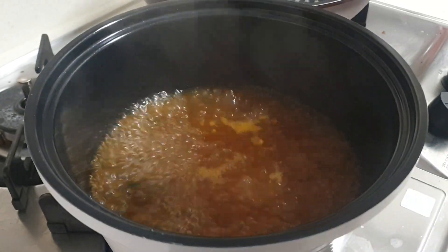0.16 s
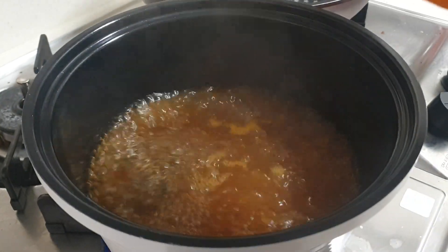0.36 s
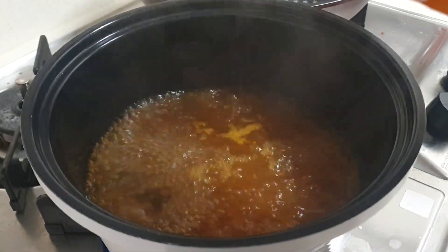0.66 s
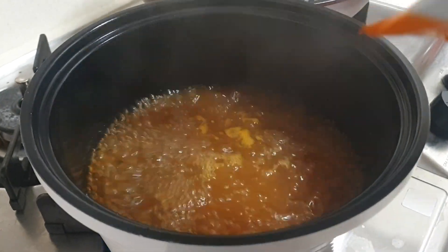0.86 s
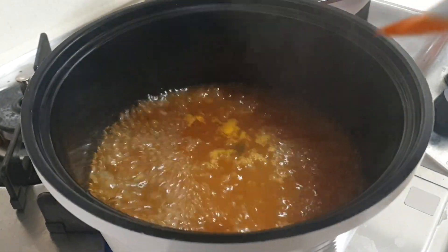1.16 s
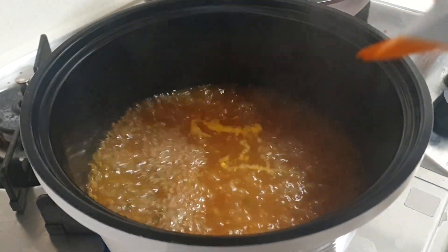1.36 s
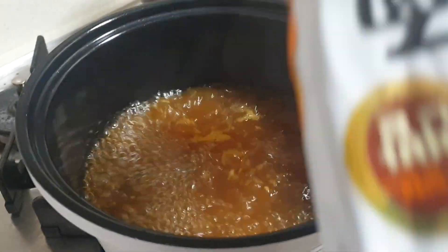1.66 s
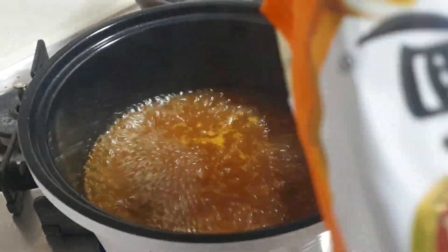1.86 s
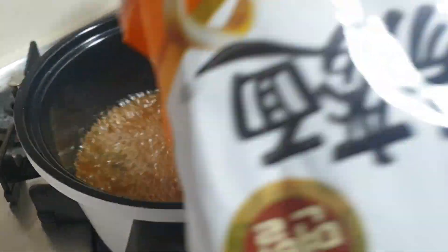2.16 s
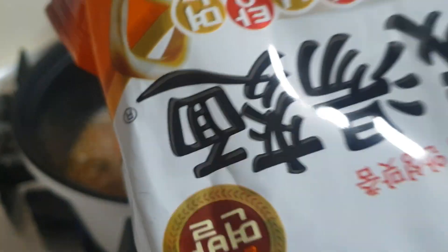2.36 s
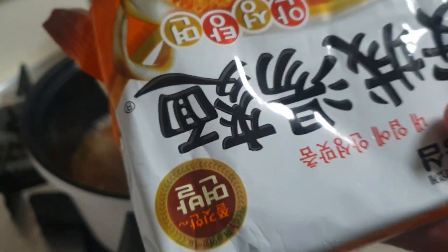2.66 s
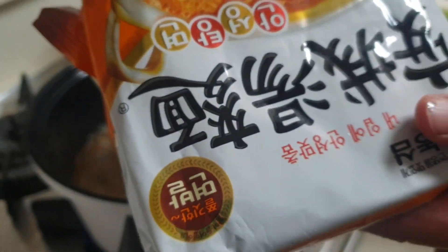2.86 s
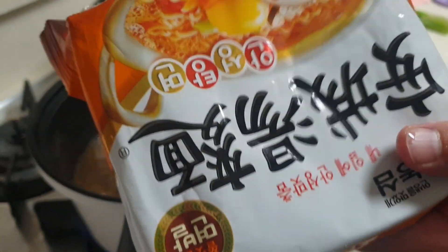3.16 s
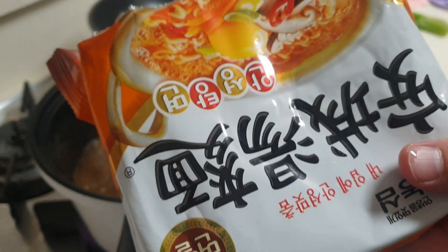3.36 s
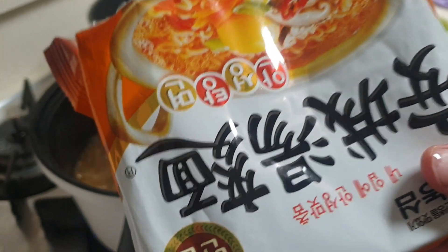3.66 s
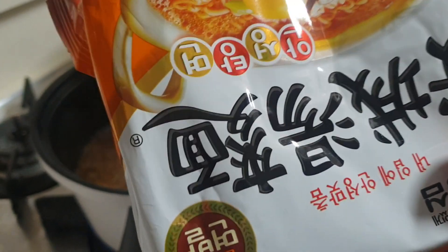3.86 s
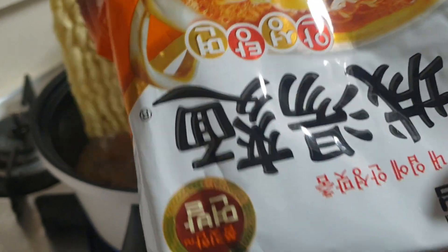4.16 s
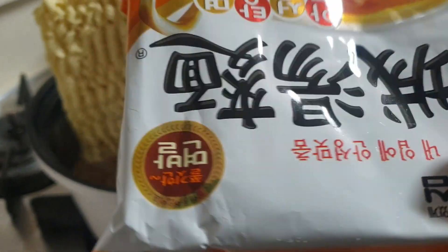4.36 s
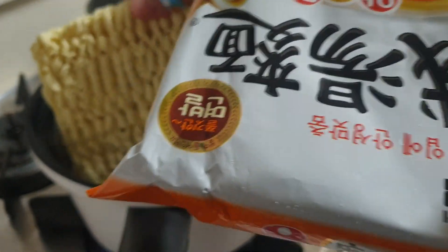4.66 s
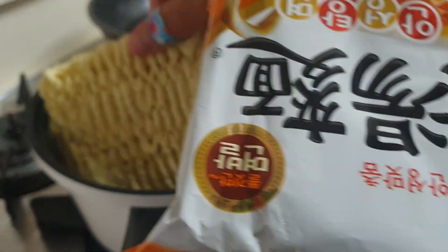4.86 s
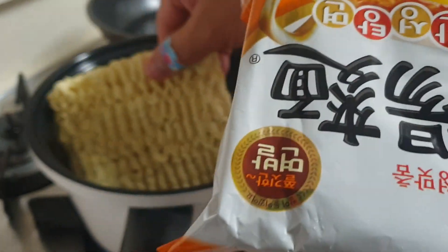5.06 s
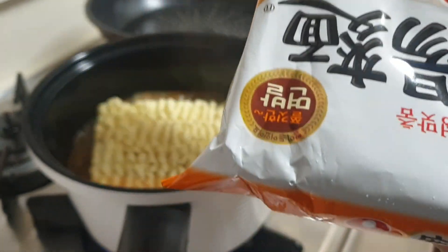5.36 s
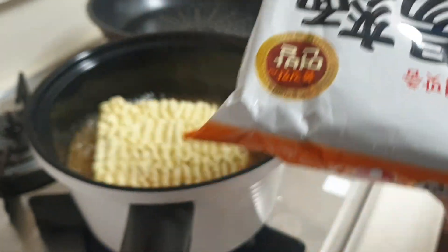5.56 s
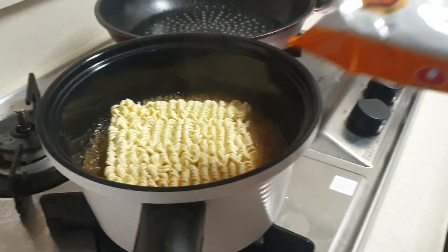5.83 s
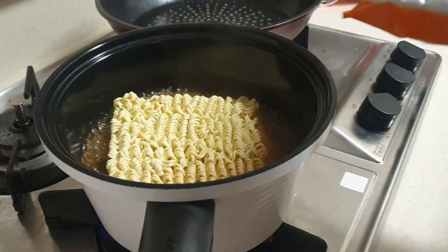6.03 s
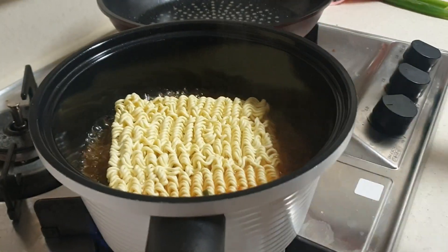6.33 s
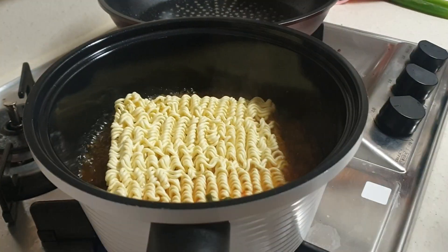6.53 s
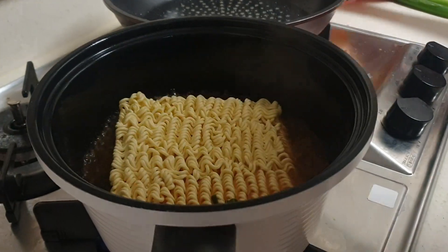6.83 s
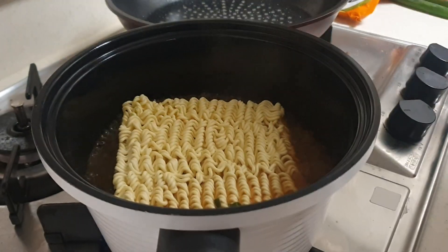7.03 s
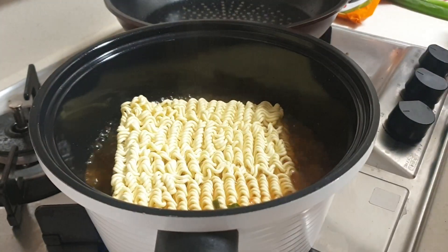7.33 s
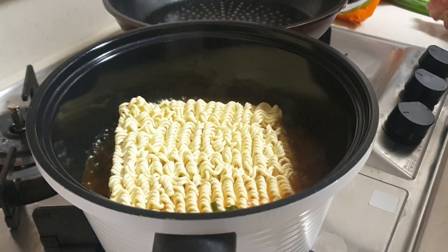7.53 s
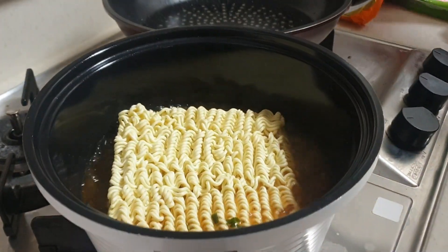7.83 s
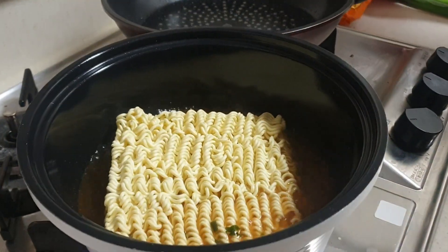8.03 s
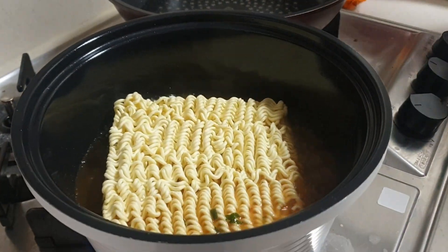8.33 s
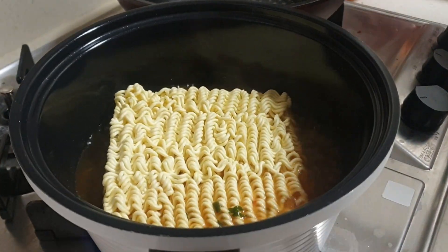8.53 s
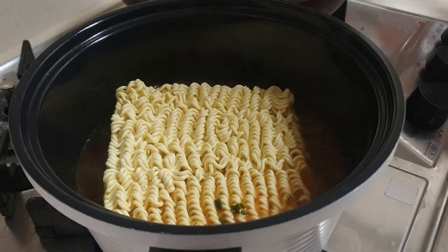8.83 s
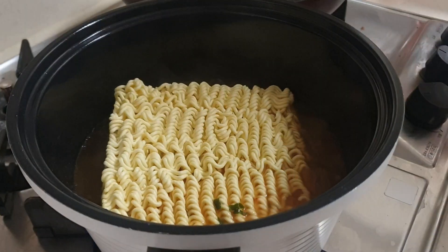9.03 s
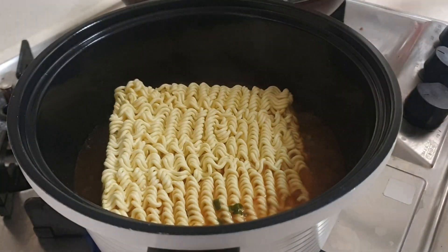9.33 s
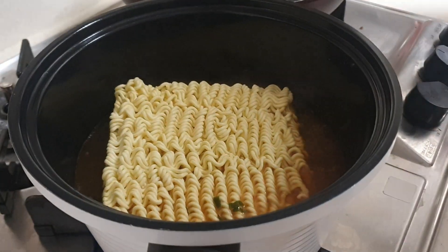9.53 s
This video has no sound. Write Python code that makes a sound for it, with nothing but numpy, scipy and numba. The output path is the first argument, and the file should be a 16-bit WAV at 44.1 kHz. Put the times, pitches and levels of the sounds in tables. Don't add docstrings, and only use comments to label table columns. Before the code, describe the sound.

Close to a handheld microphone, a stiff plastic noodle packet is grabbed and swung with dense, sharp snaps, pops and bright crinkles. The crackling thins after three seconds, leaving a soft simmer and gas flame. A dry noodle block lands with a dull thud and hollow knock, then the packet is put down with a few snaps and knocks as the bubbling grows clearer in a small hard kitchen.

```python
import sys
import numpy as np
from scipy import signal
from scipy.fft import rfft, irfft, next_fast_len
from scipy.io import wavfile
from scipy.ndimage import uniform_filter1d
from numba import njit

SR = 44100
rng = np.random.default_rng(int(sys.argv[2]) if len(sys.argv) > 2 else 0)


def volts_from_db(level):
    exponent = np.asarray(level, float) / 20
    return 10 ** exponent


def bounce(signal):
    frames = np.transpose(np.atleast_2d(signal))
    limited = np.clip(frames, -1, 1)
    pcm = np.round(limited * 32767).astype(np.int16)
    wavfile.write(sys.argv[1], SR, pcm)


N = 427329
PAD = next_fast_len(N)
HZ = np.maximum(np.fft.rfftfreq(PAD, 1 / SR), 1)
TIME = np.arange(N) / SR


def on_hz(table):
    hz, value = np.array(table).T
    return np.interp(np.log(HZ), np.log(hz), value)


def unit(x):
    return x / np.sqrt(np.mean(np.mean(x, axis=0) ** 2))


# (frequency [Hz], correlation [-1 to 1])
PORT_LIKENESS = [(60, 0.85), (300, 0.92), (800, 0.65), (2000, 0.079), (5000, 0.027)]


def pair(left, right, db, side_db=0):
    like = np.clip(on_hz(PORT_LIKENESS), 0, 1)
    a, b = rfft(left, PAD), rfft(right, PAD)
    b = like * a + np.sqrt(1 - like ** 2) * b
    both = np.array([a * volts_from_db(db + side_db / 2), b * volts_from_db(db - side_db / 2)])
    return irfft(both, PAD)[:, :N]


def noise_pair():
    return rng.standard_normal((2, N))


def band_db(lo_hz, hi_hz):
    return -10 * np.log10((1 + (lo_hz / HZ) ** 6) * (1 + (HZ / hi_hz) ** 6))


def resonance_db(modes):
    return sum(db / (1 + (2 * (HZ - hz) / width_hz) ** 2) for hz, width_hz, db in modes)


def bandpass(x, order, lo_hz, hi_hz):
    return signal.sosfilt(signal.butter(order, [lo_hz, hi_hz], "band", fs=SR, output="sos"), x)


@njit
def svf(x, hz, width):
    y, band, low = np.empty(len(x)), 0., 0.
    for i in range(len(x)):
        g, k = np.tan(np.pi * hz[i] / SR), width[i] / hz[i]
        v = (band + g * (x[i] - low)) / (1 + g * (g + k))
        band, low, y[i] = 2 * v - band, low + 2 * g * v, k * v
    return y


def fade(x, tau_s):
    return signal.lfilter([1], [1, -np.exp(-1 / (tau_s * SR))], x)


def walk(rate):
    k = int(SR / rate)
    held = np.repeat(rng.standard_normal(N // k + 1), k)
    return 0.91 * uniform_filter1d(uniform_filter1d(held, k), k)[:N]


def sparks(rate, spread_db, tau_s):
    at = rng.integers(0, N, int(rate * N / SR))
    power = np.zeros(N)
    power[at] = volts_from_db(2 * spread_db * np.minimum(rng.exponential(size=len(at)), 3))
    power = fade(power, tau_s)
    return power / power.mean()


# (time [s], level [dB], half length [s])
BURNER_SWELLS = [(4.25, -53, 0.13), (6.45, -52.5, 0.28), (8.85, -52, 0.27), (9.45, -49, .3)]


def burner_throb():
    throb_hz = 44 * (1 + 0.051 * walk(4))
    swell = sum(volts_from_db(db) * np.exp(-((TIME - s) / half_s) ** 2) for s, db, half_s in BURNER_SWELLS)
    return np.sin(2 * np.pi * np.cumsum(throb_hz) / SR) * swell


# (frequency [Hz], level [dB per Hz])
POT_COLOUR = [(25, 3.5), (50, 2), (110, -9), (250, -14), (450, -22.5), (1000, -26.5), (1330, -32),
              (1700, -25.5), (2500, -26), (2950, -33.5), (7600, -34), (9200, -34), (10000, -25.5),
              (11800, -27)]


def flame(view):
    rumble = pair(*noise_pair(), on_hz(POT_COLOUR) + band_db(35.5, 100), 0.99)
    return unit(rumble) * volts_from_db(-59.5 + 3 * view + 1.5 * walk(2.86))


# (frequency [Hz], left minus right [dB])
POT_LEAN = [(60, 10.5), (110, 1.5), (200, 7), (380, 9), (700, 15.5), (1290, 16), (2380, 15.5), (4400, 13),
            (8120, 17.5), (15000, 1.5)]
# (frequency [Hz], width [Hz], level [dB])
POT_RING = [(633, 21, 7.5), (870, 47, 2.5)]
# (frequency [Hz], width [Hz], level [dB])
GAS_JETS = [(8480, 260, 7), (9950, 200, 6), (11650, 250, 5)]


def simmer_and_steam(view):
    fizz = np.sqrt(0.68 + 0.28 * sparks(320, 5.6, 0.0058))
    colour = on_hz(POT_COLOUR) + resonance_db(POT_RING) + band_db(70.3, SR)
    colour -= 5 * np.clip(HZ / 4000 - 2.95, 0, 1)
    hiss = unit(pair(*(fizz * noise_pair()), colour, on_hz(POT_LEAN)))
    jets = irfft(rfft(hiss, PAD) * (volts_from_db(resonance_db(GAS_JETS)) - 1), PAD)[:, :N]
    hiss = hiss + jets * np.clip(1.1 - view, 0, 1)
    hiss = hiss * volts_from_db(0.5 + 2.5 * view + 0.6 * walk(9))
    for lo_hz, hi_hz in (300, 900), (900, 2700):
        patch = bandpass(hiss, 2, lo_hz, hi_hz)
        hiss = hiss + patch * (volts_from_db(2.2 * walk(16)) - 1)
    steam = unit(bandpass(fizz * noise_pair(), 3, 9500, 15500))
    steam_db = -69 + 9.5 * view + np.array([[2.1], [-2.1]])
    return hiss * volts_from_db(-57) + steam * volts_from_db(steam_db)


# (time [s], open view [0-1])
POT_VIEW = [(0, 0.6), (3.3, 0.15), (4.3, 0.05), (5.6, .5), (6.3, 0.84), (7.5, 0.9), (8.4, 0.9), (8.9, 0.9),
            (9.69, 0.8)]


def pot():
    view = np.interp(TIME, *np.transpose(POT_VIEW))
    return simmer_and_steam(view) + flame(view) + burner_throb()


def kitchen(x, t60=0.34, treble_t60=0.21, wet_db=-9):
    t = np.arange(SR // 2) / SR
    noise = rng.standard_normal((2, len(t)))
    dull = signal.lfilter([.3], [1, -.7], noise)
    tail = dull * 1000 ** (-t / t60) + (noise - dull) * 1000 ** (-t / treble_t60)
    tail *= 1 - np.exp(-t / 0.0033)
    tail /= np.sqrt(np.sum(tail ** 2, axis=1, keepdims=True))
    return x + volts_from_db(wet_db) * signal.oaconvolve(x, tail, axes=1)[:, :N]


# (time [s], peak level [dB], pitch [Hz])
SOFT_THUDS = [(0.073, -29, 105), (0.243, -40, 204), (0.537, -35.5, 78.5), (0.76, -30, 128),
              (0.853, -29, 155.5), (0.864, -32, 278), (0.999, -33.5, 204), (1.048, -36.5, 297),
              (1.235, -28.5, 149), (1.272, -27, 105), (1.456, -40, 149), (1.597, -36, 71.5),
              (2.11, -35, 272), (2.33, -37, 295), (2.422, -39.5, 294), (5.0293, -35.5, 199),
              (5.046, -41, 188), (5.355, -30, 218), (5.368, -32, 112), (5.39, -31, 218), (5.41, -38, 171),
              (5.438, -39, 110), (7.398, -41, 151), (7.54, -45, 199), (7.787, -39, 82.6)]


def thuds():
    out, t = np.zeros(N + SR), TIME[:SR // 3]
    modes = [(1.008, 1.44, 97), (0.586, 0.81, 89), (2.29, 0.53, 160), (2.5, 0.36, 93)]  # ratio, size, damping [1/s]
    for s, db, hz in SOFT_THUDS:
        ring = sum(size * np.sin(2 * np.pi * ratio * hz * t) * np.exp(-t * damp) for ratio, size, damp in modes)
        start = int(s * SR)
        out[start:start + len(t)] += volts_from_db(db) * ring * (1 - np.exp(-t / 0.0054))
    return out[:N]


# (time [s], peak level [dB], rattle length [s], favoured pitch [Hz])
POT_KNOCKS = [(5.343, -40, 0.0065, 900), (5.355, -27.5, 0.0092, 745), (5.366, -28.5, 0.0076, 1400),
              (5.392, -43, 0.0079, 2300), (5.405, -41, .01, 600), (6.907, -38, 0.009, 1300),
              (6.941, -26, 0.01, 2200), (7.079, -40, .008, 800), (7.404, -34, 0.0055, 600),
              (7.416, -33.5, 0.014, 1300), (7.472, -35.5, 0.012, 900), (7.543, -25.5, 0.0071, 1200),
              (7.553, -32, .008, 560), (8.584, -47, .008, 1500), (8.606, -37, .008, 2300),
              (9.547, -35.5, .01, 1430)]
# (frequency [Hz], level [dB], t60 [s])
POT_WALL = [(558, -2, 0.097), (693, -2, 0.083), (866, 0.5, 0.055), (1200, -3, 0.041), (1440, 4, 0.033),
            (1910, -6, 0.062), (2260, -2, 0.08), (2720, 1, 0.042), (3350, -1, 0.036)]


def knocks():
    out, t = np.zeros((2, N + SR)), TIME[:SR // 4]
    fall_db = 9.5
    for s, db, rattle_s, spot_hz in POT_KNOCKS:
        lean_db, turn = 2.4 * rng.standard_normal((2, len(POT_WALL)))
        ring = 0
        for (hz, size_db, t60), luck_db, u in zip(POT_WALL, lean_db, turn):
            mode_db = size_db + luck_db - fall_db * abs(np.log2(hz / spot_hz))
            phase = np.array([[0], [0.59 * u]])
            ring = ring + volts_from_db(mode_db) * np.sin(2 * np.pi * hz * t + phase) * 1000 ** (-t / t60)
        rattle = rng.standard_normal((1, 1200)) ** 3 * np.exp(-TIME[:1200] / rattle_s)
        hit = signal.oaconvolve(ring, rattle, axes=1)[:, :len(t)]
        start = int(s * SR)
        out[:, start:start + len(t)] += volts_from_db(db) * hit / np.abs(hit).max()
    return out[:, :N]


# (time of peak [s], level [dB], centre [Hz], fall [s])
FILM_SLIDES = [(1.18, -34, 11400, 0.014), (2.32, -53, 910, 0.065), (4.13, -64.5, 4700, 0.051),
               (4.43, -46, 3400, 0.018), (4.48, -55, 3850, .02), (5.04, -59.5, 594, 0.034),
               (5.37, -43.5, 680, 0.022), (5.985, -55, 2460, 0.026), (6.481, -54, 2200, 0.019),
               (7.421, -45, 1190, 0.035), (7.562, -40, 1440, 0.024), (8.0, -54.5, 1760, 0.048),
               (8.6, -50.5, 1870, 0.047), (8.48, -58, 3400, 0.046), (9.102, -46, 10000, 0.0098),
               (9.245, -42, 2180, 0.043), (9.248, -44, 10400, 0.052), (9.31, -40, 10700, 0.032),
               (9.315, -44, 2730, 0.045), (9.24, -46.5, 6050, 0.032), (9.31, -43.5, 5560, 0.035),
               (9.3, -44, 14000, .03), (9.46, -51, 10000, 0.02)]
# (time of peak [s], level [dB])
AIR_HUMS = [
    (.93, -43),
    (7.56, -47),
]
# (time of peak [s], level [dB], pitch [Hz], fall [s], width [Hz])
EDGE_WHISTLES = [
    (.975, -41, 6600, 0.017, 300),
    (1.172, -35, 11000, 0.014, 1100),
]


def slides():
    grain = np.sqrt(.5 + .5 * sparks(440, 1.9, 0.012))
    noise = noise_pair() + .5 * rng.standard_normal(N)
    hums = [(s, db, 657, 0.028, 62) for s, db in AIR_HUMS]
    rubs = [(s, db, hz, fall_s, min(1.46 * hz, 4070)) for s, db, hz, fall_s in FILM_SLIDES]
    out = np.zeros((2, N))
    for s, db, hz, fall_s, width_hz in hums + rubs + EDGE_WHISTLES:
        rise_s = 0.41 * fall_s
        near = slice(int((s - .12) * SR), int((s + .25) * SR))
        t = TIME[near]
        centre, width = hz + 0 * t, width_hz + 0 * t
        rub = [svf(svf(side[near], centre, width), centre, width) for side in noise]
        swell = np.exp(-np.where(t < s, ((s - t) / rise_s) ** 2, (t - s) / fall_s))
        out[:, near] += unit(np.array(rub)) * volts_from_db(db) * swell
    return out * grain


# (time [s], peak
# level [dB], ring [Hz])
POPS_AND_PRICKS = [(0.0781, -20, 2210), (0.104, -18.5, 1930), (0.1445, -18.5, 2320), (0.354, -22, 1070),
                   (0.397, -22.5, 910), (0.7541, -19, 1130), (0.847, -14.5, 2700), (0.8755, -21, 1260),
                   (1.066, -14, 2870), (1.25, -12, 3440), (1.6592, -17, 1900), (1.9085, -16.5, 3430),
                   (2.084, -28.5, 1100), (2.1167, -21, 4800), (2.1743, -27, 1250), (2.265, -30, 1200),
                   (2.308, -26, 2310), (2.4128, -32, 1610), (2.49, -20, 1660), (2.562, -14.5, 2400),
                   (2.5839, -17, 2400), (2.6915, -24, 3520), (2.7482, -22.5, 3450), (3.0029, -28.5, 1570),
                   (4.292, -33.5, 2510), (4.343, -34, 1200), (4.4239, -24, 3270), (4.4662, -28.5, 2400),
                   (4.602, -36, 1860), (5.802, -33.5, 990), (1.044, -29, 10000), (1.6261, -15.5, 9600),
                   (1.6275, -30, 2600), (1.722, -31, 4550), (2.336, -31.5, 417), (2.2922, -35, 604),
                   (2.612, -29.5, 990), (4.422, -28, 1920), (6.129, -36, 3350), (8.72, -37, 10500),
                   (9.16, -53, 10500), (9.37, -32, 7560),
                   (0.0629, -35, 2410), (0.152, -26, 2400), (0.25, -31, 2020), (0.2906, -26, 3980),
                    (0.502, -31, 2630), (0.551, -33, 1160), (0.6496, -22, 2590), (0.7296, -29, 2700),
                    (0.83, -27, 3040), (0.9237, -24, 2200), (0.971, -23, 2260), (1.1599, -14.5, 6400),
                    (1.229, -35, 2190), (1.265, -16, 6200), (1.271, -19, 620), (1.2978, -16.5, 2870),
                    (1.3314, -36, 2620), (1.3774, -28, 2250), (1.443, -28, 990), (1.4657, -24, 2750),
                    (1.597, -33, 3530), (1.6265, -28, 2050), (1.721, -29, 1150), (1.755, -30, 1140),
                    (1.9625, -33, 3050), (1.989, -31, 1020), (2.155, -32, 1270), (2.212, -31, 3740),
                    (2.2942, -24.5, 1160), (2.318, -31, 1380), (2.3342, -30, 2540), (2.3514, -33, 1170),
                    (2.3754, -33, 1190), (2.5224, -26, 2500), (2.635, -33, 2500), (2.7272, -32, 3490),
                    (2.7952, -32, 2540), (2.8347, -32, 2550), (3.299, -38, 880), (5.736, -38.5, 3000),
                    (5.7787, -39, 1640), (5.9274, -40, 1570), (5.9783, -36, 1490), (6.2615, -37, 2180),
                    (5.8925, -28, 10500), (8.5892, -32.5, 1230), (8.608, -37, 2450), (8.8652, -37, 1920),
                    (9.097, -36, 1760), (9.2229, -41, 3340), (9.311, -24, 4760), (9.4485, -33, 2220)]
# (time [s], peak level [dB], ring [Hz])
CREASE_PRICKS = [(0.255, -26, 10900), (0.077, -25, 12400), (0.1042, -30, 10300), (0.1438, -16, 11300),
                 (0.2473, -22, 10200), (0.2912, -27, 9840), (0.3545, -28, 10100), (0.5952, -18, 13000),
                 (0.406, -24, 11300), (0.55, -28, 9050), (0.5852, -13.5, 12100), (0.6578, -16, 12300),
                 (0.7312, -19.5, 9700), (0.7638, -14, 10200), (0.846, -21, 10100), (0.8599, -19, 10000),
                 (0.9254, -32, 13200), (0.972, -19, 12900), (1.0002, -14, 13700), (1.1596, -18, 10900),
                 (1.2306, -23, 10400), (1.25, -17, 14800), (1.271, -24, 9770), (1.29, -16, 9650),
                 (1.373, -25, 11200), (0.62, -19, 12500), (1.4681, -22, 12200), (1.4868, -10.5, 9940),
                 (1.5968, -32, 10700), (1.6103, -12.5, 9620), (1.659, -25, 9770), (1.6708, -16, 13600),
                 (1.706, -21, 10500), (1.8315, -13, 14200), (1.863, -26, 10200), (1.9123, -15, 12600),
                 (1.7092, -19, 9500), (2.488, -28, 10600), (2.51, -18, 13000), (2.557, -19, 11800),
                 (2.5657, -13.5, 10200), (2.6372, -19.5, 10400), (2.6952, -27, 10100), (2.729, -21, 10500),
                 (2.8858, -35, 13500), (3.2438, -22.5, 10250), (3.714, -43, 10300), (4.29, -32, 11600),
                 (4.4249, -21, 10800), (0.769, -19, 10000), (5.355, -26, 11300), (5.8012, -41, 9600),
                 (5.8478, -38, 13300), (6.1833, -12.5, 11200), (6.947, -20, 6200), (6.9407, -14.5, 10250),
                 (7.4714, -39, 11300), (7.5428, -37, 11700), (8.54, -37, 10200), (9.032, -24.5, 9640)]


def stray_crackles(grip_db, count=900, end_s=9.45):
    at, size = rng.random((count, 2)).T
    at = (at * end_s * SR).astype(int)
    slack_db = np.maximum(-49 - grip_db[at], 0)
    jolts = np.zeros(N)
    jolts[at] = volts_from_db(grip_db[at] + 4.5 - 28 * size - 2 * slack_db)
    rings = [(k / SR, 20 * np.log10(jolts[k]) + 4, 1100 * 11.9 ** u) for k, u in zip(at, rng.random(count))]
    return jolts, rings


def cracks(film, grip_db):
    out, t = np.zeros((2, N + SR)), TIME[:SR // 40]
    jolts, strays = stray_crackles(grip_db)
    rings = strays + POPS_AND_PRICKS + CREASE_PRICKS
    for (s, db, hz), (turn, scatter) in zip(rings, rng.random((len(rings), 2))):
        cycles = turn + np.array([[0], [0.11 + 0.24 * scatter]])
        ring = np.cos(2 * np.pi * (hz * t + cycles)) * np.exp(-t / (0.00071 + 1.04 / hz))
        ring *= 1 - np.exp(-t / .0001)
        start = int(s * SR)
        out[:, start:start + len(t)] += volts_from_db(db) * ring
        jolts[start] = volts_from_db(db - 15.0)
    return out[:, :N] + film * fade(jolts, 0.001)


def avalanches(s, length, chance, db, tau_s, first_db, fizz_db, count=14):
    late = length[:, None] * 3 * chance[:, :count]
    size_db = db[:, None] - 4 * late / length[:, None] - 18 * chance[:, count:]
    late[:, 0], size_db[:, 0] = 0, db + first_db
    power = np.zeros(N + SR)
    np.add.at(power, ((s[:, None] + late) * SR).astype(int), volts_from_db(2 * size_db))
    power, t = fade(power, tau_s), TIME[:SR // 6]
    for start, level_db, run_s in zip((s * SR).astype(int), db + fizz_db, length):
        power[start:start + len(t)] += volts_from_db(2 * level_db) * np.exp(-t / run_s) * (1 - np.exp(-t / 0.003))
    return power[:N]


def beyond(total_db, quiet_db):
    return np.maximum(volts_from_db(2 * total_db) - volts_from_db(2 * quiet_db), 0)


# (time [s], peak level [dB], body share 1.2-7.5 kHz [dB], avalanche length [s])
GRAB_SNAPS = [(0.063, -30.5, -1, 0.014), (0.0764, -15.5, -2, 0.0081), (0.1038, -16.5, 0, 0.0086),
              (0.150, -22.5, -4, 0.02), (0.202, -24.5, -5.5, 0.026), (0.2482, -19, -1.5, 0.0095),
              (0.2894, -22, -4, 0.011), (0.354, -28, 0, 0.015), (0.4055, -22.5, -4, 0.0099),
              (0.516, -31, -2, 0.023), (0.551, -25, -3.5, 0.044), (0.585, -13, -8.5, 0.016),
              (0.657, -25.5, -1, 0.041), (0.7308, -18.5, -11, 0.018), (0.763, -15.5, -5, 0.0089),
              (0.852, -26, -3, 0.022), (0.859, -17.5, -4.5, 0.0087), (0.925, -19, -10, 0.079),
              (0.9722, -21, -16, 0.039), (1.008, -16.5, -6.5, 0.033), (1.061, -18.5, -2, 0.0078)]
SWING_SNAPS = [(1.154, -18, -31, 0.003), (1.226, -22.5, -2, 0.015), (1.25, -14, -3.5, 0.024),
               (1.3744, -15.5, -2, 0.0032), (1.466, -19.5, -5, 0.016), (1.484, -17, -2.5, 0.022),
               (1.598, -28, -1, 0.014), (1.607, -24, -13, 0.0099), (1.627, -20.5, -3.5, 0.014),
               (1.661, -20, 0.5, 0.0086), (1.669, -17.5, -8, 0.0075), (1.721, -22, -2.5, 0.008),
               (1.7789, -29, -7, 0.012), (1.808, -31, -6, 0.011), (1.8293, -24, -1, 0.0039),
               (1.863, -25.5, -1.5, 0.0044), (1.909, -23.5, -7.5, 0.018), (1.983, -24, -3, 0.015),
               (2.115, -22.5, -3, 0.016), (2.162, -28.5, -2, 0.012), (2.213, -30.5, -1, 0.015),
               (2.265, -37, -2, 0.0061), (2.288, -30.5, 3, 0.016)]
TAUT_SNAPS = [(2.487, -21, -1, 0.0073), (2.514, -23, -6.5, 0.011), (2.558, -19.5, -1.5, 0.016),
              (2.58, -23, 1, 0.0092), (2.634, -20.5, -3.5, 0.0077), (2.691, -20, -4, 0.0079),
              (2.715, -25.5, -19, 0.035), (2.747, -21, -6, 0.008), (2.792, -25.5, -3, 0.0092),
              (2.803, -21.5, -3.5, 0.011), (2.835, -25, -4.5, 0.0066), (2.886, -27.5, -3, 0.0052),
              (3.002, -38.5, -1, 0.027), (3.049, -30, -4.5, 0.026), (3.13, -28.5, -4.5, 0.024),
              (3.242, -26, -3, 0.013)]
EMPTY_SNAPS = [(3.716, -33.5, -4.5, 0.0052), (4.287, -30.5, -4, 0.0096), (4.422, -26, -9, 0.006),
               (4.462, -32.5, 0, 0.01), (4.602, -43, 6.5, 0.0086), (5.336, -32, -6, 0.022),
               (5.349, -22, -5, 0.012), (5.73, -44.5, 1, 0.027), (5.803, -37, -8, 0.012),
               (5.847, -33, -12, 0.0077), (5.856, -28.5, -12, 0.015), (6.127, -39, -5, 0.014),
               (6.1823, -20, -13, 0.007)]
LAID_SNAPS = [(6.905, -36.5, 2, 0.013), (6.919, -26, -4.5, 0.014), (6.9395, -13.5, -8.5, 0.018),
              (7.077, -31, -4, 0.025), (7.406, -31, -11, 0.0076), (7.472, -29.5, -9.5, 0.018),
              (7.5413, -25, -3, 0.013), (7.867, -36, -2, 0.021), (8.536, -32, -7.5, 0.017),
              (8.585, -40, 1, 0.028), (8.868, -34, -10.5, 0.0071), (8.977, -32, -5, 0.021),
              (9.035, -25.5, -8, 0.028), (9.18, -36, -3, 0.022), (9.554, -34.5, -3.5, 0.06)]
# (level [dB]); slack film booms, taut film does not
BELLY_OF_GESTURE = [
    -14,
    -13,
    -20,
    -13,
    -12,
]
RUSTLE_LEVELS = [
    -8.5,
    0.56,
    -2,
]


def snaps_and_rustle(grip_db):
    gestures = GRAB_SNAPS, SWING_SNAPS, TAUT_SNAPS, EMPTY_SNAPS, LAID_SNAPS
    at, peak_db, share_db, length = np.concatenate(gestures).T
    chance = rng.random((len(at), 28))
    snaps = at, np.clip(length, .002, .1), chance
    belly = np.repeat(BELLY_OF_GESTURE, [len(g) for g in gestures]) + share_db - 0.079 * (peak_db + 17.5)
    belly = peak_db + belly
    body = peak_db + np.minimum(share_db, 0)
    top = peak_db + 10 * np.log10(np.clip(1 - volts_from_db(2 * share_db), .03, 1))
    grain = 0.017 + 0.2 * sparks(380, 7.2, 0.0066)
    belly_rustle, body_rustle, top_rustle = (grip_db + db for db in RUSTLE_LEVELS)
    powers = [avalanches(*snaps, belly - 3.0, 0.002, 0.96, -4.5) + beyond(belly_rustle, -66.5) * grain,
              avalanches(*snaps, body - 8, 0.0011, -20.0, -6) + beyond(body_rustle, -51.0) * grain,
              avalanches(*snaps, top - 9, 0.0012, 0.85, -6.0) + beyond(top_rustle, -63.0) * grain]
    return powers, at, chance


# (frequency [Hz], level [dB per Hz])
FILM_COLOUR = [(29, -45), (50, -6), (85, 9), (423, -10.5), (637, -4.5), (935, -6.5), (1220, -5),
               (1340, -6.5), (2690, -5), (7730, -10.5), (9820, -4.5), (15500, -5.5)]
# (low edge [Hz], high edge [Hz])
FILM_REGIONS = [
    (300, 1200),
    (1200, 7500),
    (7500, 17000),
]


def film_noise(at, chance):
    films = [unit(pair(*noise_pair(), on_hz(FILM_COLOUR) + band_db(lo, hi))) for lo, hi in FILM_REGIONS]
    latest = np.maximum(np.searchsorted(at, TIME) - 1, 0)
    panel_hz = (1500 * 4.6 ** chance[:, 0])[latest]
    crease_hz = (8000 * 2.02 ** chance[:, 1])[latest]
    for region, hz, width, gain in (1, panel_hz, 0.59, 0.5), (2, crease_hz, 0.52, 0.49):
        ring = np.array([svf(side, hz, width * hz) for side in films[region]])
        films[region] = unit(films[region] + gain * ring)
    return films


# (time [s], squeeze level [dB], left minus right [dB])
HAND_GRIP = [(0.0, -47, 3.5), (0.21, -54, 2), (0.47, -51, 4), (0.75, -35, 2.5), (1.1, -40.5, 4.5),
             (1.35, -43, 3.5), (2.45, -47.5, 7), (2.7, -46.5, 7.5), (3.4, -57, 9), (4.8, -64.5, 7.5),
             (5.72, -55, 7.5), (5.99, -45.5, 5), (6.45, -55, 7), (7.15, -52, 6.5), (8.23, -53, 7.5),
             (8.97, -63, 7.5), (9.23, -45, 5.5), (9.69, -47, 5.5)]


def packet():
    s, *columns = np.transpose(HAND_GRIP)
    grip_db, pan_db = (np.interp(TIME, s, c) for c in columns)
    powers, at, chance = snaps_and_rustle(grip_db)
    films = film_noise(at, chance)
    belly, body, top = (film * np.sqrt(power) for film, power in zip(films, powers))
    handling = unit(pair(*noise_pair(), on_hz(FILM_COLOUR) + band_db(78, 700)))
    push = np.sqrt(np.abs(uniform_filter1d(powers[0], SR // 50)))
    bass = handling * push * volts_from_db(-4.0) + thuds()
    close = belly + slides() + cracks(films[1] + films[2], grip_db) + knocks()
    lean = np.array([pan_db, -pan_db]) / 2
    out = body * volts_from_db(lean) + close * volts_from_db(1.02 * lean) + top * volts_from_db(0.54 * lean)
    return out + bass * volts_from_db(1.6 * (lean - np.array([[3.3], [-3.3]])))


def scene():
    return kitchen(packet()) + pot()


def band_limit(x):
    return signal.sosfilt(signal.butter(12, 16980, fs=SR, output="sos"), x)


def record(dry):
    dry = signal.sosfilt(signal.butter(3, 33, "high", fs=SR, output="sos"), dry)
    edge = signal.sosfilt(signal.butter(2, 11000, "high", fs=SR, output="sos"), dry)
    dry = dry + np.array([[-.2], [.2]]) * edge
    mix = signal.sosfilt(signal.ellip(12, .2, 55, 15780, fs=SR, output="sos"), dry)
    return band_limit(mix)


dry = scene()
out = record(dry)
bounce(out)
```